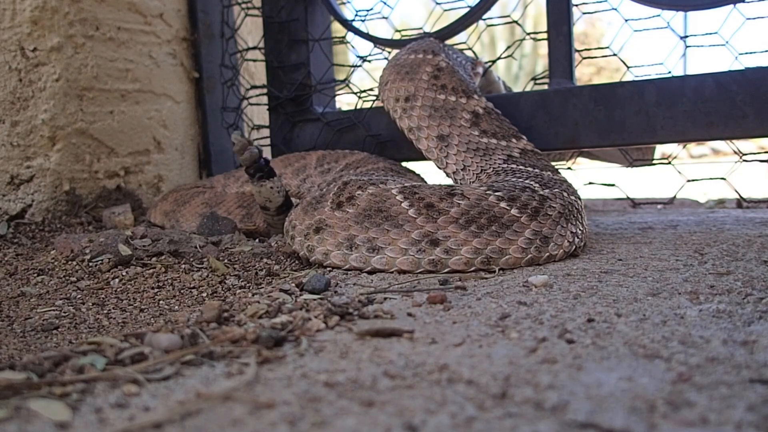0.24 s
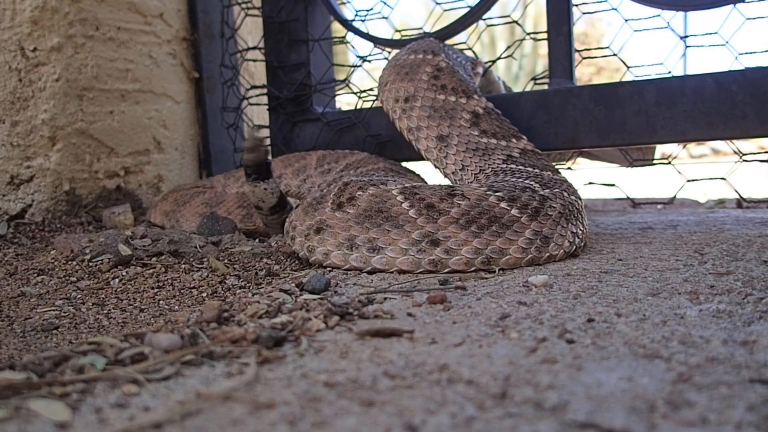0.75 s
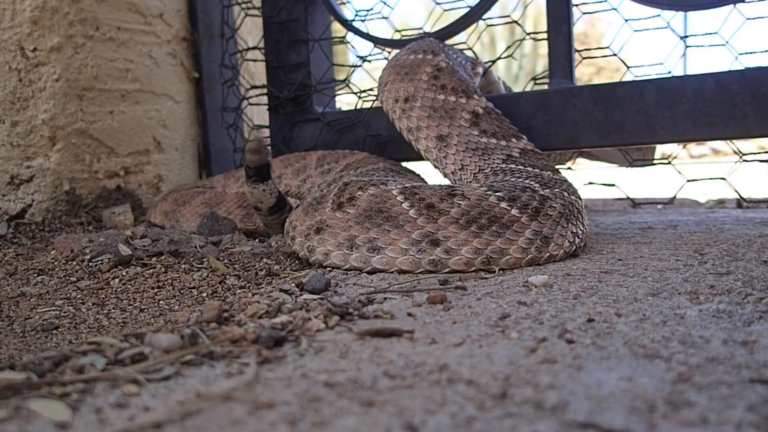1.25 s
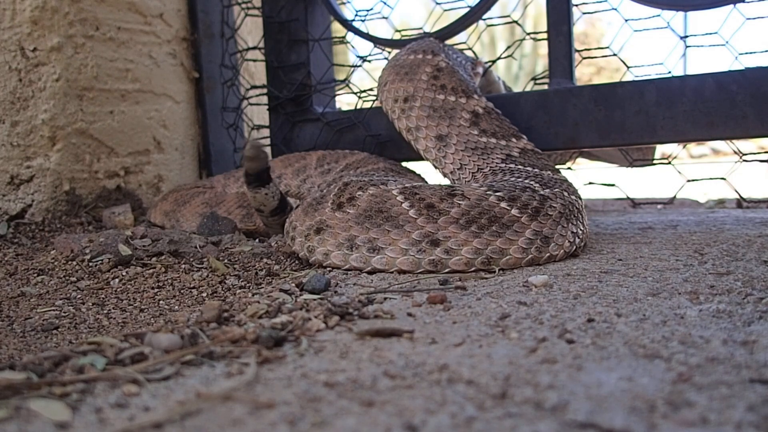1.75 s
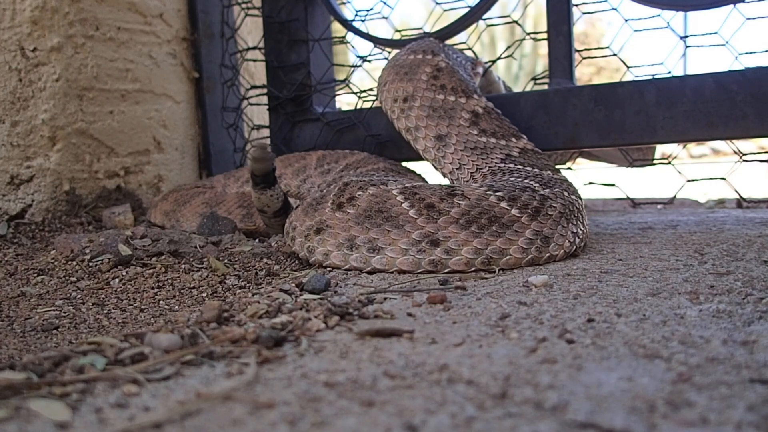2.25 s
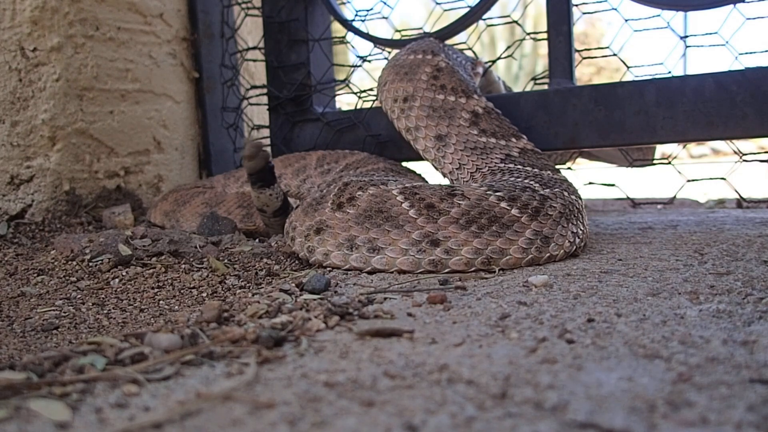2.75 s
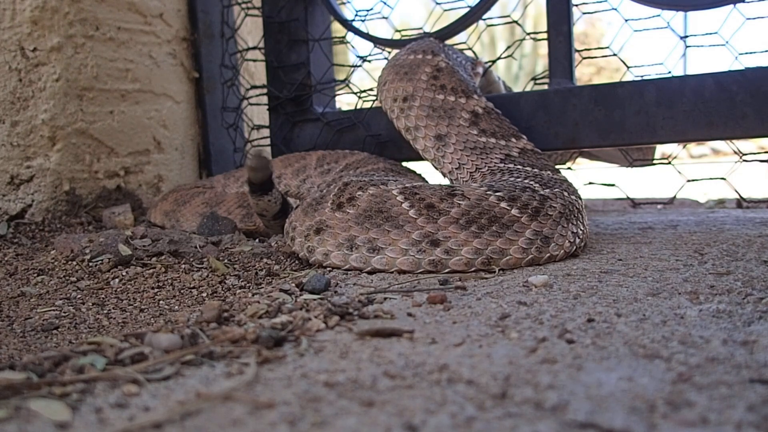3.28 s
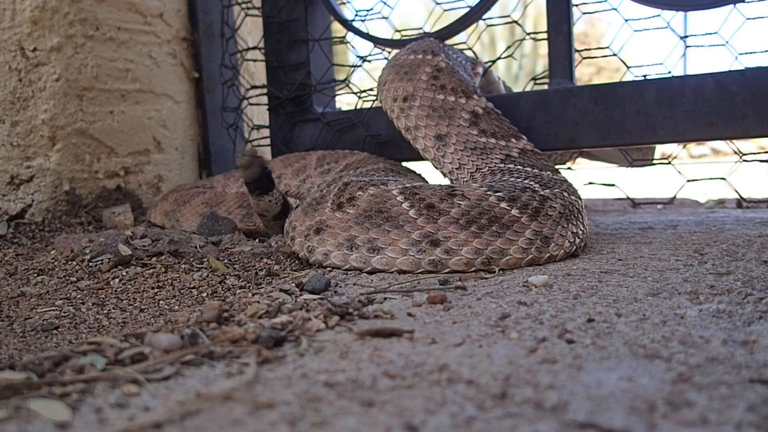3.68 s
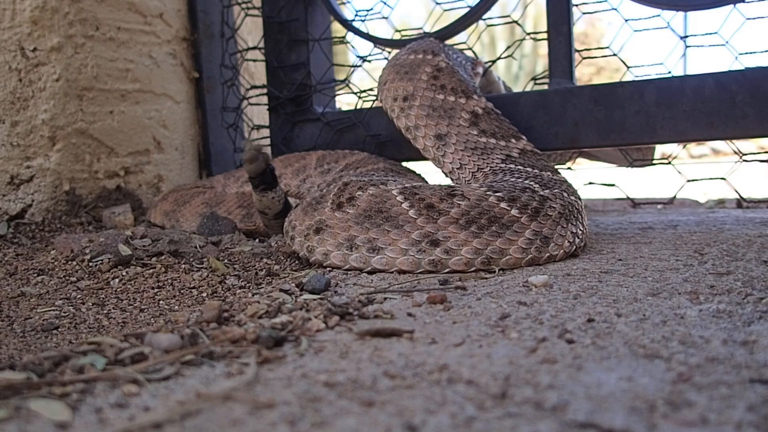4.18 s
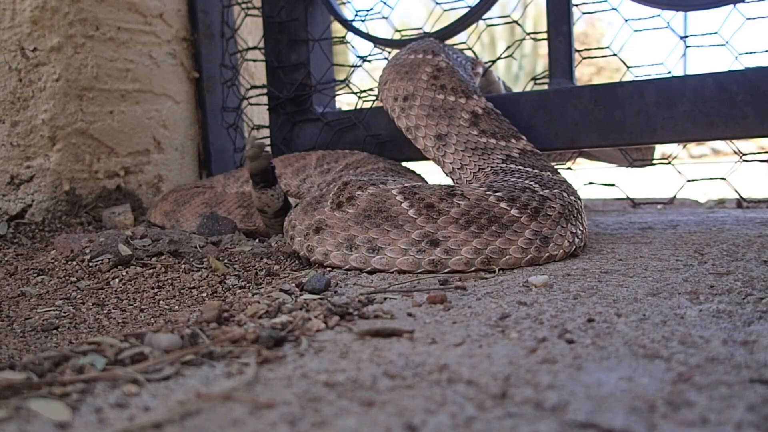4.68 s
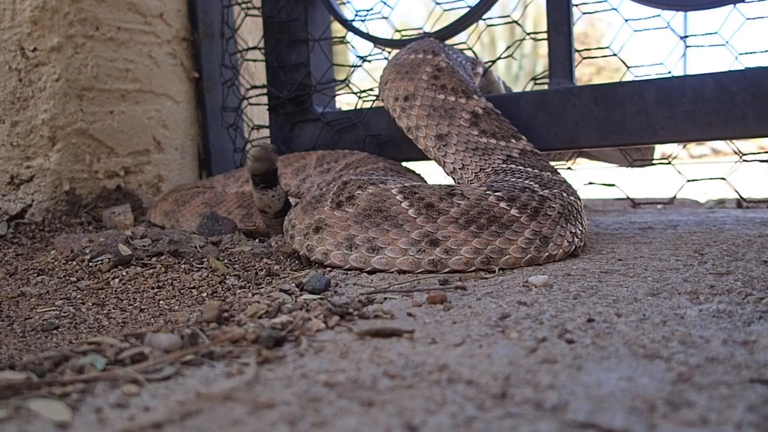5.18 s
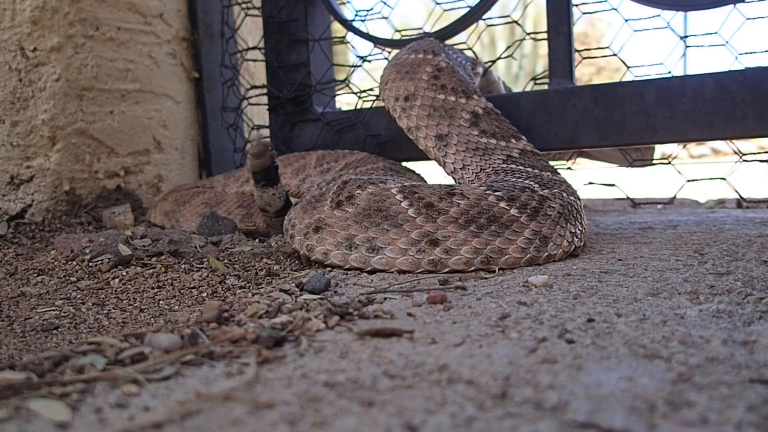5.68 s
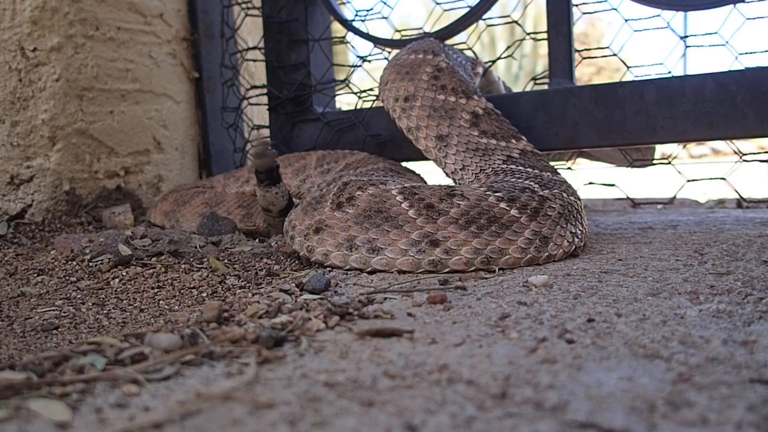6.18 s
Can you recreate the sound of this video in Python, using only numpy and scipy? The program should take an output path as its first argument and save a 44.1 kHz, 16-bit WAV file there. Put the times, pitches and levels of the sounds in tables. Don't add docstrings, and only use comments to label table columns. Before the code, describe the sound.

A nearby rattlesnake shakes dry, separate clacking strokes that quicken into a harsh steady buzz, over faint distant machine hum and outdoor air.

```python
import sys
import numpy as np
from scipy import signal
from scipy.fft import rfft, irfft
from scipy.io import wavfile
from scipy.ndimage import uniform_filter1d

SR = 44100
rng = np.random.default_rng(int(sys.argv[2]) if len(sys.argv) > 2 else 0)


def unload_wav(signal):
    wavfile.write(
        sys.argv[1],
        SR,
        np.round(np.clip(np.atleast_2d(signal).T, -1, 1) * 32767).astype(np.int16),
    )


def convert_level_to_amplitude(level_db):
    exponent = np.asarray(level_db, float) / 20
    return 10 ** exponent


N = 283563


def evened(x):
    return x / np.sqrt(np.mean(abs(x) ** 2) + 1e-20)


def read(points, hz):
    f, value = np.transpose(points)
    return np.interp(np.log(hz + 1), np.log(f + 1), value)


def noise(level_db, size, same, patch_db):
    hop = size // 4
    frames, hz = N // hop + 5, np.fft.rfftfreq(size, 1 / SR)
    a, b, c, d, patches = rng.standard_normal((frames, len(hz), 5)).T
    patches = uniform_filter1d(patches, size=5, axis=0)
    patches = evened(uniform_filter1d(patches, size=6, axis=1))
    left, other = a + 1j * b, c + 1j * d
    right = same * left + np.sqrt(1 - same ** 2) * other
    field_db = level_db(hz, np.arange(frames) * hop / SR)
    z = np.array([left, right]) * convert_level_to_amplitude(field_db + patch_db * patches)
    return signal.istft(z, nperseg=size, noverlap=size - hop)[1][:, :N]


def ring(x, hz, width, skirt):
    r = np.exp(-np.pi * width * np.array([1, skirt]) / SR)
    return signal.lfilter([np.prod(1 - r)], np.poly(r * np.exp(2j * np.pi * hz / SR)), x)


def hum():
    # (frequency [Hz], density [dB per Hz])
    hum_shape = [(25, -28), (52, -19), (65, 0.5), (80, -7), (110, 7), (135, -5.5), (167, 0), (200, -5.5),
                 (280, -11), (335, -2.5), (385, -10), (412, -3.5), (450, -20), (620, -60)]
    # (frequency [Hz], level over the idle level [dB])
    engine_lines = [(45, 5), (135, 7.5)]
    rumble_db, drone_db, swell_db, idle_db = -22.0, -19.0, 1.3, -59
    rumble_share = 0.11
    leave_s, leave_db_per_s, gone_db = 2.1, -9, -21
    t = np.arange(N) / SR
    swell_hz = np.geomspace(1.5, 9.0, 16)
    low_turn, high_turn = rng.random((2, 16))

    def leaving_db(s):
        return np.clip(leave_db_per_s * (s - leave_s), gone_db, 0)

    def swell(s, turn):
        return swell_db * evened(np.sin(2 * np.pi * (np.outer(s, swell_hz) + turn)).sum(1))

    def field_db(hz, s):
        low = rumble_db + rumble_share * leaving_db(s) + swell(s, low_turn)
        high = drone_db + swell(s, high_turn)
        return read(hum_shape, hz)[:, None] + np.where(hz[:, None] < 235, low, high)

    idle = sum(convert_level_to_amplitude(db) * np.sin(2 * np.pi * hz * t) for hz, db in engine_lines)
    drones = noise(field_db, size=4096, same=0.89, patch_db=1.7) / 64
    return drones + convert_level_to_amplitude(idle_db + leaving_db(t)) * idle


def air():
    # (frequency [Hz], density [dB per Hz])
    air_shape = [(330, -32), (480, 1), (560, 0), (598, 3.5), (635, -.9), (1000, -3.5), (1500, -5.5),
                 (2300, -9.5), (3900, -16), (5200, -6.5), (6300, -12), (8000, -13.5), (10000, -16.5),
                 (16000, -18)]
    wash = noise(lambda hz, s: read(air_shape, hz)[:, None], size=1024, same=0.77, patch_db=2.0)
    return convert_level_to_amplitude(-49.5) * evened(wash)


def stroke_clacks(count=5):
    # (start [s], length [s], level [dB],
    # first clack relative to level [dB], lag of the first straggler [s])
    strokes = [(.0018, .015, -25, 1, 0.026), (0.057, 0.03, -19, -8, 0.061), (0.1372, .023, -19.5, 1, 0.048),
               (.2200, 0.021, -19, 1, 0.046), (0.312, 0.025, -15, -11, 0.031),
               (0.4104, 0.029, -19, -3, 0.05), (0.5063, 0.028, -18, -7, 0.05),
               (0.597, 0.032, -18.5, 1.5, 0.08), (0.6824, .020, -17, -5, 0.051),
               (.758, 0.024, -20, 2.5, 0.053), (.835, 0.025, -18.5, 4, 0.028),
               (.893, 0.025, -16, -8, 0.039), (.9565, 0.018, -17, -3, 0.026),
               (1.009, 0.039, -18.5, 0, 0.041), (1.08, 0.025, -19, 1, .037),
               (1.141, 0.02, -15.5, -4, 0.019), (1.2, 0.024, -16.5, -5, .041),
               (1.263, .026, -17.5, -5, .040), (1.33, .023, -18.5, 0, 0.03), (1.389, .023, -22.5, 3, 0.027),
               (4.252, .021, -19, -8, .038), (4.315, .020, -24.5, 0, .030), (6.324, .031, -16.5, -4, .044),
               (6.392, .033, -19, 2, .036)]
    jitter, uneven_db, sag_db = .3, 3.7, -2.5
    late_db, later_s, later_db = -9, 0.016, -14.5
    tick_db, tick_span_s = -24, .075
    start, length, level_db, first_db, lag = np.transpose(strokes)[..., None]
    draw = rng.uniform(-1, 1, (len(strokes), count, 4))
    place = np.linspace(0, 1, count)
    shift = jitter * draw[..., 0] * abs(np.sin(np.pi * place)) ** .5 / count
    after = length * (place + shift)
    db = level_db + np.where(place == 0, first_db, uneven_db * draw[..., 1]) + sag_db * place ** 2
    ticks_db = level_db + tick_db + 2 * uneven_db * draw[..., 3]
    s = start + np.hstack([after, lag, lag + later_s, tick_span_s * abs(draw[..., 2])])
    db = np.hstack([db, level_db + late_db, level_db + later_db, ticks_db])
    return s.ravel(), db.ravel()


def single_clacks(count=3, rebound_s=.002, rebound_db=-8.5):
    s, db = stroke_clacks()
    draw = rng.random((len(s), count, 2))
    waits = -rebound_s * np.log(1 - draw[..., 0])
    later = s[:, None] + .0007 + np.cumsum(waits, axis=1)
    weaker = db[:, None] + rebound_db - 3.1 * draw[..., 1] - 1.6 * np.arange(count)
    s, db = np.append(s, later), np.append(db, weaker) - 1.5
    tip_db, base_db = 0 * s, -2.0 + 0 * s
    return np.transpose([s, db, tip_db, base_db])


def chirp():
    # (time [s], level [dB], pitch [Hz])
    whistle = [
        (.272, -70, 6000),
        (.285, -39, 6120),
        (.298, -42, 6200),
        (.308, -66, 6230),
    ]
    time, db, hz = np.transpose(whistle)
    t = np.arange(N) / SR
    turns = np.cumsum(np.interp(t, time, hz)) / SR
    return convert_level_to_amplitude(np.interp(t, time, db, -200, -200)) * np.sin(2 * np.pi * turns)


def buzz_clacks(count=7, spread_s=.0015, uneven_db=2.0, lead_db=3.5, step_db=-1.5, trim_db=3.0):
    # (time [s], effort [dB], ring of the tip [dB], turns of the tail [per s])
    buzz_course = [(1.415, -32.5, 0, 133), (1.47, -28.5, 2.5, 122), (1.62, -27, 1.5, 135),
                   (1.88, -28, -1.5, 133), (2.04, -29.5, -1.5, 130), (2.43, -29.5, -1, 108),
                   (2.72, -29, .5, 114.6), (2.981, -28.8, -1, 139), (3.252, -29, -4, 131),
                   (3.55, -30.5, -4.5, 128), (3.9, -30, -3, 122), (4.201, -30, -3, 114),
                   (4.4, -30.5, -2.5, 124), (4.7, -29, 0, 119), (5.1, -29, -0.5, 116),
                   (5.6, -30, -0.5, 113.4), (6.0, -29, 2, 130), (6.45, -30, -1, 125)]
    # (time [s], depth [dB], length [s])
    lulls = [(2.527, 5, 0.06), (2.693, 1.5, 0.022), (3.669, 11, 0.011), (3.803, 4.5, 0.029),
             (4.183, 7, 0.024), (4.245, 8, 0.034), (4.270, 5, 0.066), (4.302, 19, 0.043), (4.366, 5, 0.017),
             (4.734, 4, 0.012), (4.84, 2, 0.027), (5.475, 13, 0.022), (5.604, 3, 0.02), (6.344, 9, 0.085),
             (6.37, 7.5, .05), (6.411, 7, .08)]
    time, effort, tip, rate = np.transpose(buzz_course)
    t = np.arange(N) / SR
    turns = np.cumsum(np.interp(t, time, rate)) / SR + .3
    at = t[1:][np.diff(np.floor(turns)) > 0][:900]
    draw = rng.random((900, count, 2))[:len(at)]
    s = at[:, None] + np.cumsum(-spread_s * np.log(1 - draw[..., 0]), axis=1)
    db = step_db * np.arange(count) - uneven_db * np.log(1 - .95 * draw[..., 1])
    db[:, 0] = lead_db + 0.2 * db[:, 0]
    effort_db = np.interp(s, time, effort, left=-150)
    tip_db = np.interp(s, time, tip)
    for centre, depth_db, length in lulls:
        effort_db -= 1.6 * depth_db * np.exp(-((s - centre) / (0.2 * length)) ** 2)
    db = db + trim_db + effort_db
    return np.transpose([s.ravel(), db.ravel(), tip_db.ravel(), 0 * s.ravel()])


def rattle(clacks, colour_db=2.5, skirt=2.95, wander=0.08, scatter=1.29):
    # (frequency [Hz], width [Hz], level [dB], left over right [dB], left lead [rad])
    shell_modes = [(1186, 880, -25, 0, 0.21), (2157, 370, -27, 0, -1.4), (3167, 287, -18.5, -11.5, -0.5),
                   (3657, 180, -18, 2, 0.56), (4537, 217, -11.5, -4, -0.14), (5047, 222, -6.5, -4.5, -0.11),
                   (5490, 220, -8.5, 2, 0.58), (5930, 227, -9, 5, -0.29), (6450, 260, -13.5, -8.5, -.3),
                   (7100, 52, -8, .2, 0.78), (7250, 80, -9.5, 14.5, -1.8), (7697, 230, -5.5, -3, 0.26),
                   (8008, 447, 0.5, 1.5, 0.43), (8770, 430, -10.5, 2, -0.82), (9400, 266, -11, -1, -0.21),
                   (10100, 270, -16, 3, 1.2), (11010, 470, -17, 4, 0.23), (12880, 1960, -16.5, 1.5, 0.42),
                   (14200, 890, -18.5, -2.5, -0.15), (15500, 300, -20, -3, .2)]
    hz, width, mode_db, pan_db, lead = np.transpose(shell_modes)
    at = (clacks[:, 0] * SR).astype(int)
    db, tip_db, base_db = clacks[:, 1:].T
    draw = rng.standard_normal((len(at), len(hz), 4))
    tip, base = (hz > 6700) & (hz < 9900), hz < 4000
    share_db = mode_db + tip * tip_db[:, None] + base * base_db[:, None]
    share = convert_level_to_amplitude(share_db + colour_db * draw[..., 0])
    share *= (convert_level_to_amplitude(db) / np.sqrt(share ** 2 @ width))[:, None]
    ears, out = np.array([[.5], [-.5]]), 0
    for k in range(len(hz)):
        place = 1j * lead[k] + wander * (draw[:, k, 2] + 1j * draw[:, k, 3])
        hits = share[:, k] * np.exp(1j * scatter * draw[:, k, 1])
        drive = np.zeros((2, N + SR // 10), complex)
        drive[:, at] = hits * convert_level_to_amplitude(ears * pan_db[k]) * np.exp(ears * place)
        out = out + ring(drive[:, :N], hz[k], width[k], skirt).real
    return convert_level_to_amplitude(63.0) * out


def corner(x):
    # (frequency [Hz], time to fall 60 dB [s])
    decay_times = [
        (1000, 0.032),
        (5000, 0.2),
        (8000, 0.11),
        (15000, 0.072),
    ]
    out = 0
    for k in range(3):
        taps = np.zeros((2, 8820))
        at = np.arange(60, 8800, 20) + rng.integers(0, 20, (2, 437))
        np.put_along_axis(taps, at, rng.choice([-1., 1.], at.shape), 1)
        taps[1] = .8 * taps[0] + .6 * taps[1]
        hz, t, z = signal.stft(taps, SR, nperseg=128)
        fading = convert_level_to_amplitude(-60 * t / read(decay_times, hz)[:, None])
        tail = signal.istft(z * fading, SR, nperseg=128)[1]
        tail = tail / np.linalg.norm(tail[0])
        share = np.sqrt(2 / 3) * np.cos(np.pi * (7 * np.arange(N) / SR + k / 3))
        out = out + signal.oaconvolve(share * x, tail, axes=1)[:, :N]
    return out


def knocks():
    # (time [s], peak [dB], ring [Hz], time to fall 60 dB [s])
    knock_list = [(2.959, -25.5, 975.6, 0.032), (2.954, -38, 360, 0.076), (2.998, -33.5, 949, 0.04),
                  (4.42, -39, 560.2, 0.078), (4.445, -39, 785, 0.059), (4.5, -36.5, 349, 0.077),
                  (4.57, -41, 579.5, 0.092), (4.763, -36, 421.6, 0.071), (4.805, -37, 352, 0.08),
                  (4.985, -38, 400.6, 0.099), (5.855, -39, 332.6, 0.13), (5.975, -39, 321, 0.21),
                  (6.0, -40.5, 568.4, 0.077), (6.01, -37, 446, 0.081)]
    t, out = np.arange(N) / SR, np.zeros(N)
    edge = evened(ring(rng.standard_normal(N), 910, 1400, 4.5).real)
    for s, peak_db, ring_hz, t60 in knock_list:
        u = np.maximum(t - s, 0)
        onset = 1 - np.exp(-u / 0.0011)
        out += convert_level_to_amplitude(peak_db - 60 * u / t60) * onset * (np.sin(2 * np.pi * ring_hz * u) + 0.31 * edge)
    return out


def scene():
    snake = rattle(np.vstack([single_clacks(), buzz_clacks()]))
    return hum() + air() + snake + convert_level_to_amplitude(-8.0) * corner(snake) + chirp() + knocks()


def top_cut(x):
    return signal.sosfilt(signal.butter(12, 16520, fs=SR, output="sos"), x)


def record(dry):
    # (frequency [Hz], width [Hz], depth [0-1])
    notches = [
        (1880, 170, 0.72),
        (2710, 290, 0.35),
        (4890, 33, 1),
        (7920, 20, 0.65),
        (8400, 68, 0.44),
    ]
    x = dry
    for hz, width, depth in notches:
        x = x - depth * signal.lfilter(*signal.iirpeak(hz, hz / width, SR), x)
    mid, side = (x[0] + x[1]) / 2, (x[0] - x[1]) / 2
    side_db = [(900, -1.0), (1700, -10.0), (4150, -14.5), (4350, 0.0)]  # (frequency [Hz], gain [dB])
    side = irfft(rfft(side) * convert_level_to_amplitude(read(side_db, np.fft.rfftfreq(N, 1 / SR))), N)
    band_limit = signal.firwin(511, 15800, window=("kaiser", 9), fs=SR)
    x = signal.oaconvolve(np.array([mid + side, mid - side]), band_limit[None], "same")
    return top_cut(x)


dry = scene()
out = record(dry)
unload_wav(out)
```